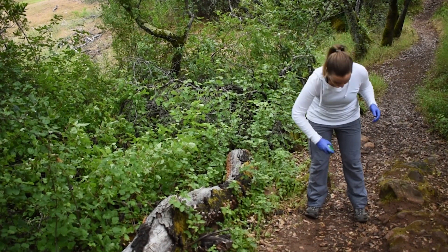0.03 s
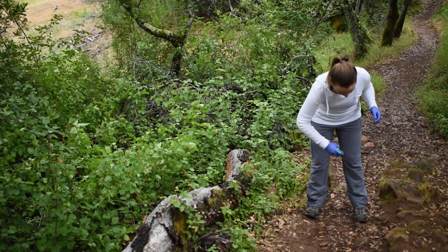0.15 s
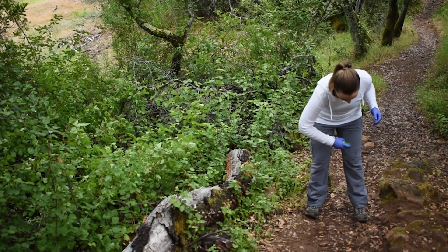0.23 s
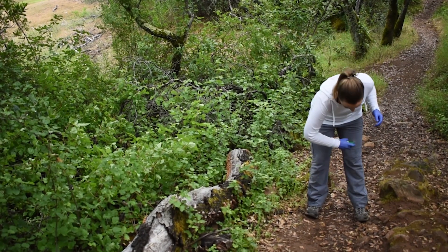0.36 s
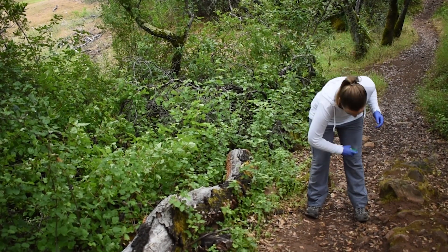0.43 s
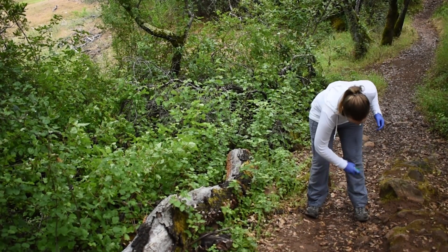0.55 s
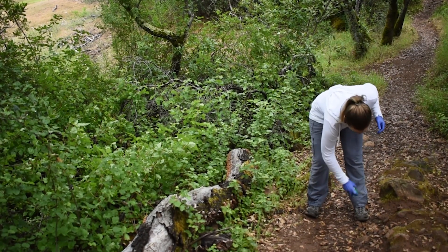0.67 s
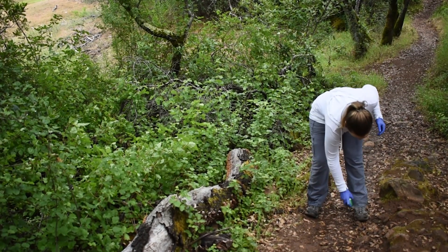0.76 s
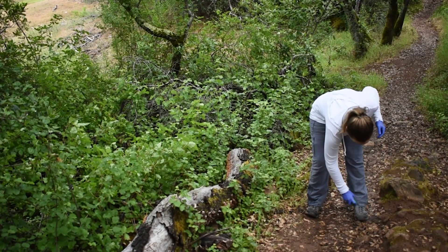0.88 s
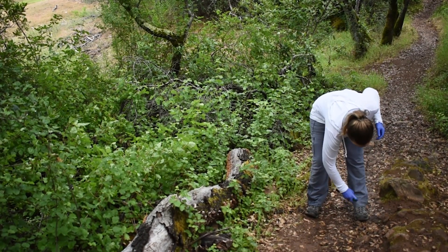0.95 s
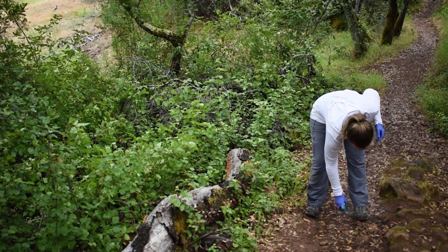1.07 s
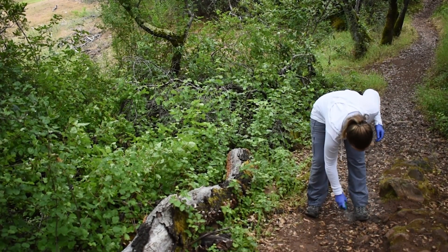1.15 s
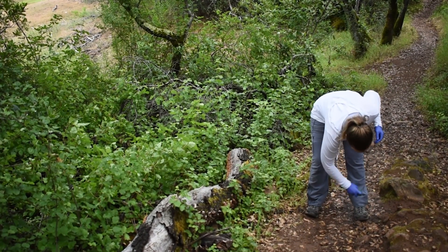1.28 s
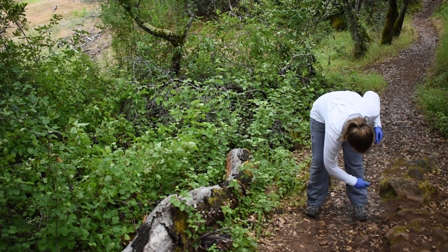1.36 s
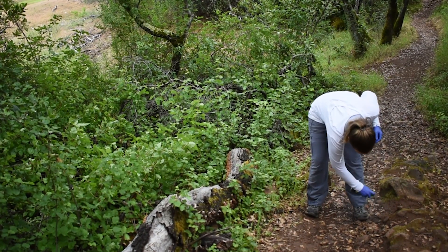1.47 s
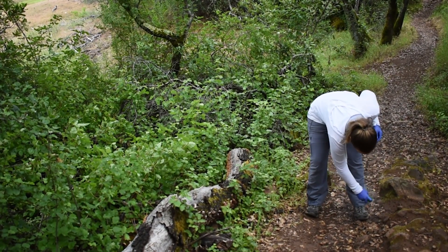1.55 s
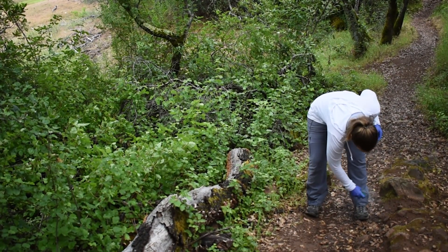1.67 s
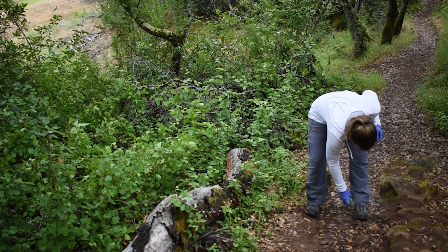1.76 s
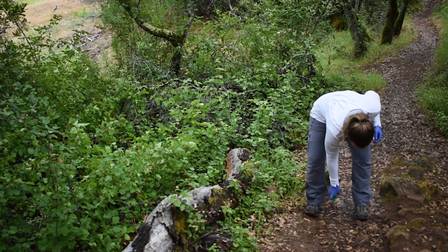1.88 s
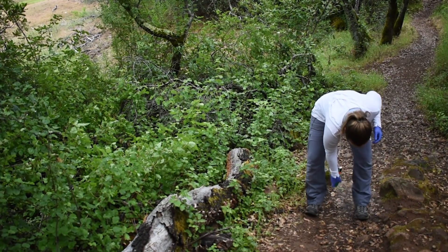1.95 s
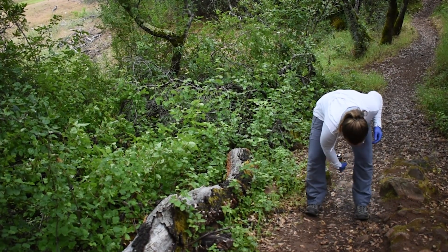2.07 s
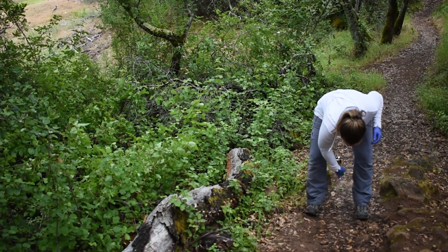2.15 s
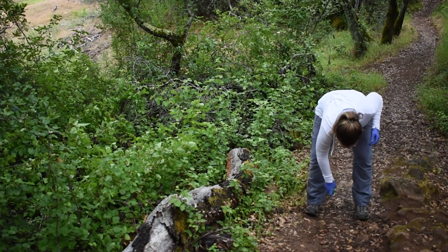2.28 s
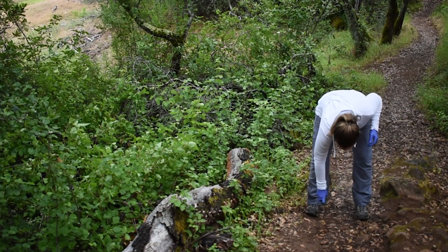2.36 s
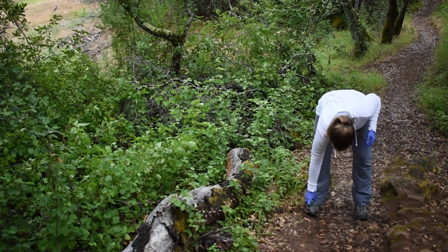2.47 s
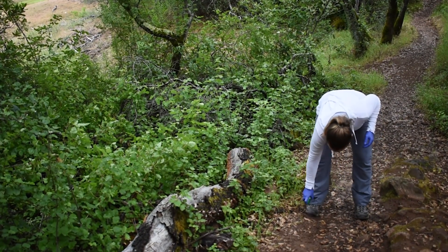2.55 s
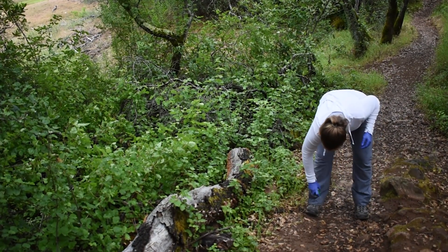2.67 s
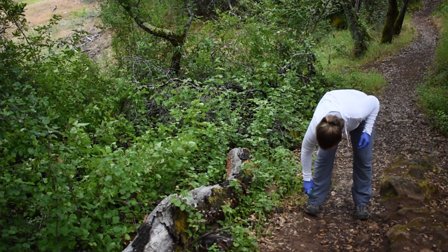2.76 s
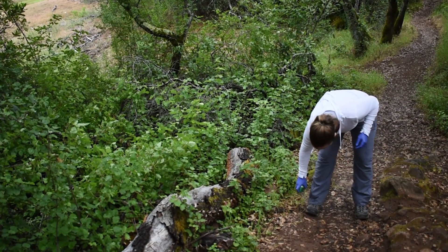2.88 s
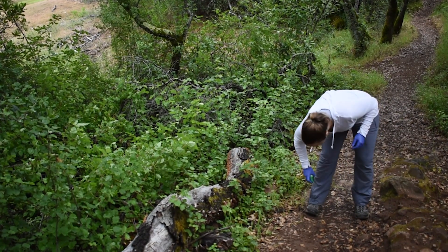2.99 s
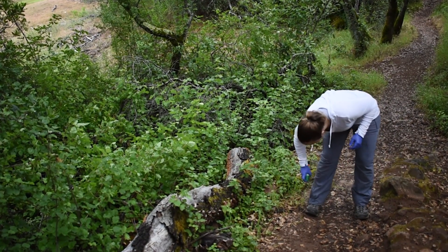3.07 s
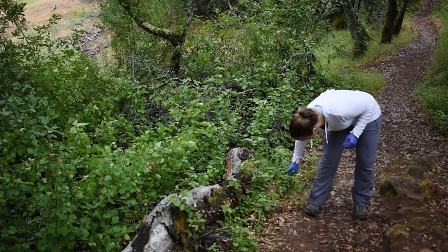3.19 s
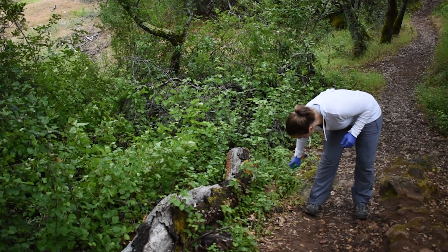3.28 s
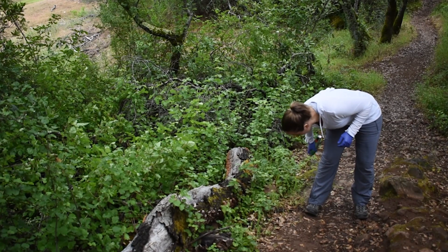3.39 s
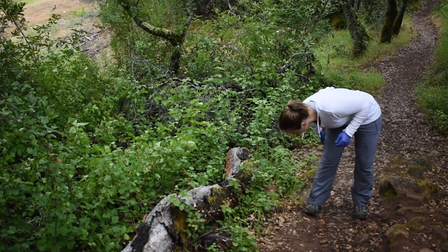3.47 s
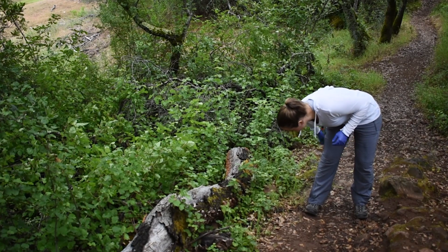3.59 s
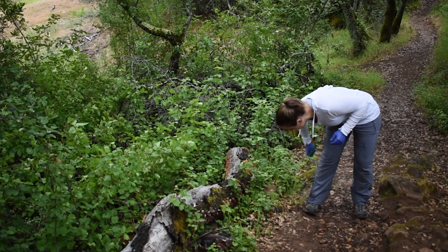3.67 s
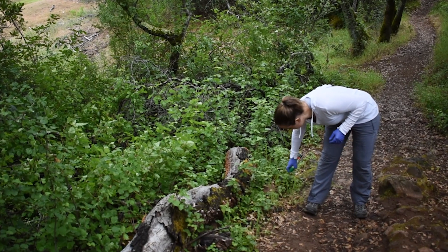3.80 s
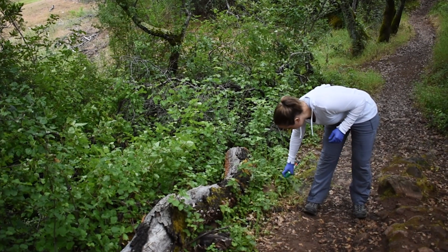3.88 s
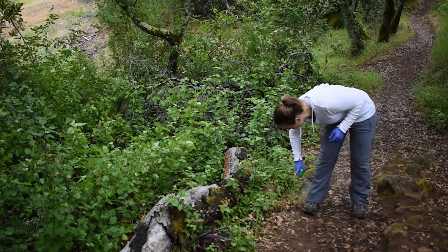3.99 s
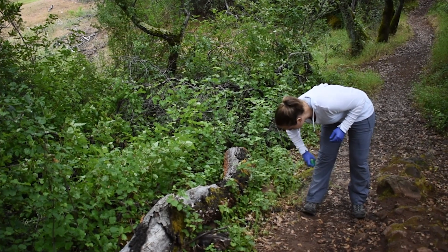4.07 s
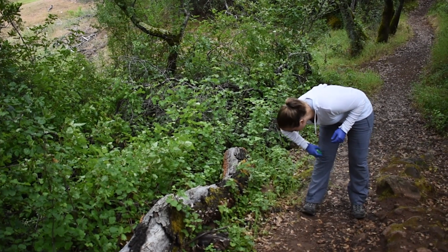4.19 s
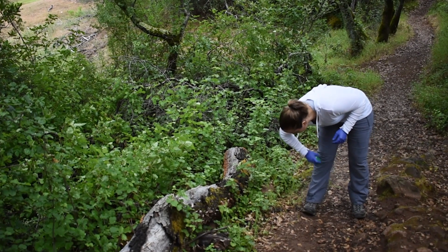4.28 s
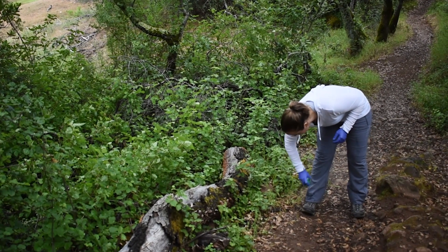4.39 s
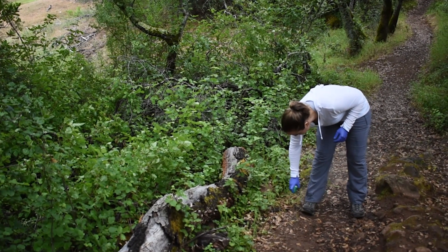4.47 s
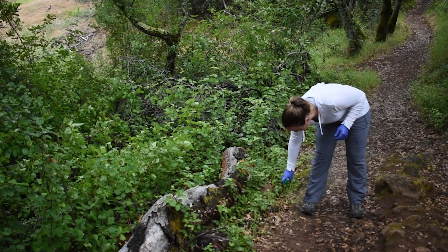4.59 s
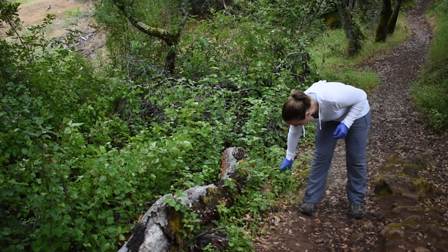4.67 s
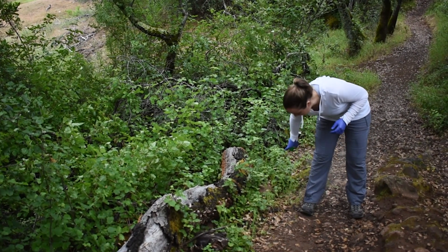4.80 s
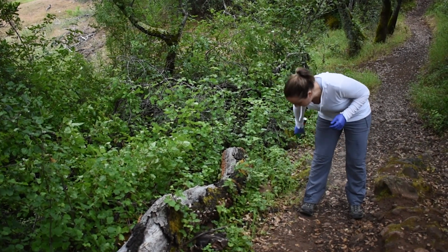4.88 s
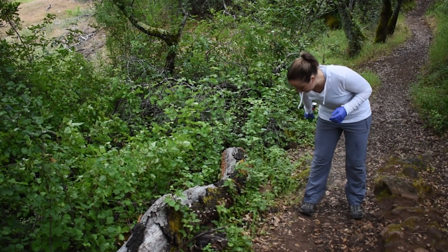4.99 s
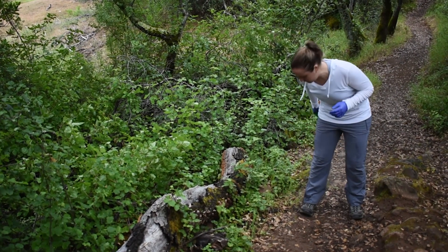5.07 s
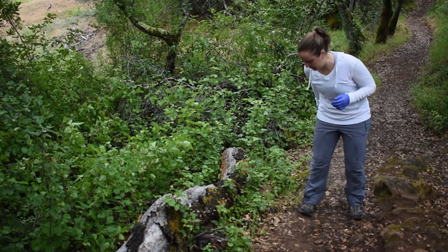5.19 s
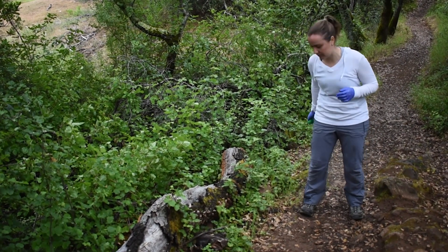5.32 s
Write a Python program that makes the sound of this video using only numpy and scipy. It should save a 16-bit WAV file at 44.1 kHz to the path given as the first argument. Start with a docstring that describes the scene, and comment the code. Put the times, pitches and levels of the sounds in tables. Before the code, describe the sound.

On a wooded path, two long bursts of fizzy spray dominate, separated by a quarter-second gap. Their colour shifts as the hand moves, with a breathy hollow tone underneath. Grip ticks and tiny bird calls precede them; gliding chips to the left grow clearer later, joined by a faint distant whistle. A soft clothing bump and rustle follow the second spray. Wide, soft outdoor air, a centred source and light woodland echo.

```python
"""Two long sprays from a hand-held bottle of repellent, swept over shoes and trouser legs on a forest trail.
The jet is filtered noise that hisses and sputters; a narrow air resonance makes a hollow tone at the nozzle,
and drifting echoes off legs and ground colour the jet as the hand moves.
A bird repeats a gliding chip in the trees among other calls; struck modes tick and bump,
and clothes rustle as filtered noise while the person straightens up after the second spray."""
import sys
import numpy as np
from scipy import signal
from scipy.fft import rfft, irfft
from scipy.io import wavfile
from scipy.ndimage import map_coordinates

SR = 44100
rng = np.random.default_rng(int(sys.argv[2]) if len(sys.argv) > 2 else 0)


def master(y):
    """Save y as 16-bit WAV."""
    cut = np.clip(np.atleast_2d(y).T, -1, 1)
    pcm = np.round(cut * 32767)  # scale
    wavfile.write(sys.argv[1], SR, pcm.astype(np.int16))


N = 235802
T = np.arange(N) / SR  # time of every sample, s


def gain_of(db):
    """Level law: decibels to amplitude ratio."""
    return 10 ** (np.asarray(db) / 20)


def evened(x):
    """Power normalization: scales to rms 1."""
    return x / np.sqrt(np.mean(x ** 2) + 1e-20)


def read(points, hz):
    """Logarithmic frequency scale: interpolates a spectrum along it."""
    f, value = np.transpose(points)
    return np.interp(np.log(hz + 1), np.log(f + 1), value)


def follow(curves):
    """Piecewise-linear envelope: joins the curves of both sprays, one value per sample."""
    return np.interp(T, *np.vstack(curves).T)


def add(mix, s, sound):
    """Superposition: adds a sound into the mix at time s."""
    part = mix[max(round(s * SR), 0):][:len(sound)]
    part += sound[:len(part)]


def noise(spectrum):
    """Spectral shaping: random noise of rms 1 that falls away beyond the ends of its spectrum."""
    hz = np.fft.rfftfreq(N, 1 / SR)
    below, above = (spectrum[0][0] / 2, -70), (spectrum[-1][0] * 2, -70)
    shape = gain_of(read([below, *spectrum, above], hz))
    return evened(irfft(rfft(rng.standard_normal(N)) * shape, N))


def wander(rate_hz):
    """Low-passed randomness: motion of rms 1, no faster than about the given rate."""
    hz = np.fft.rfftfreq(N, 1 / SR)
    return evened(irfft(rfft(rng.standard_normal(N)) * np.exp(-(hz / rate_hz) ** 2), N))


def resonate(x, hz, width_hz):
    """Resonance: a one-pole filter in a rotating frame, gain 1 at the moving frequency hz."""
    turn = np.exp(2j * np.pi * np.cumsum(hz) / SR)
    r = np.exp(-np.pi * width_hz / SR)
    return 2 * (turn * signal.lfilter([1 - r], [1, -r], x / turn)).real


def delayed(x, delay_s):
    """Doppler principle: a shrinking delay raises the pitch of what is read through it."""
    return map_coordinates(x, [(T - delay_s) * SR], order=3, mode="mirror")


def ring(modes, tilt_db=0):
    """Modal decay: a struck object as dying sines of alternating sign, tilted about 2 kHz."""
    t = np.arange(SR // 10) / SR
    partials = []
    for hz, db, t60 in modes:
        level_db = db + tilt_db * np.log2(hz / 2000) - 60 * t / t60
        partials.append(gain_of(level_db) * np.sin(2 * np.pi * hz * t))
    return sum(partials[::2]) - sum(partials[1::2])


def trees(x, t60):
    """Diffuse scattering: a decaying random tail from trunks and leaves, different at each ear."""
    t = np.arange(SR) / SR
    late = t > .008  # the tail starts after 8 ms
    tail = rng.standard_normal((2, SR)) * gain_of(-60 * t / t60) * late
    return signal.fftconvolve(x[None], tail / np.linalg.norm(tail[0]), axes=1)[:, :N]


# spectrum of the forest air: frequency_hz, relative density_db (per Hz)
FOREST_SPECTRUM = [(20, -4), (35, -4), (90, 1), (200, -1), (350, -1), (500, -4.5), (850, -6), (1200, -9),
                   (2300, -13), (3500, -12), (4400, -12.5), (5400, -19.5), (7500, -23), (15500, -26.5)]
# likeness of the two ears: frequency_hz, correlation (0-1)
EAR_LIKENESS = [(30, .75), (500, .72), (1000, .55), (2200, .15), (4200, .15), (6500, .85), (14000, .92)]
FOREST_DB, FOREST_SWELL_DB, FOREST_SWELL_HZ = -65, .8, 1.9


def forest():
    """Interaural coherence: a soft wash of air and leaves, widened by frequency, over a far low drone."""
    likeness = np.clip(read(EAR_LIKENESS, np.fft.rfftfreq(N, 1 / SR)), 0, 1)
    mid = irfft(rfft(noise(FOREST_SPECTRUM)) * np.sqrt((1 + likeness) / 2), N)
    side = irfft(rfft(noise(FOREST_SPECTRUM)) * np.sqrt((1 - likeness) / 2), N)
    air = np.array([mid + side, mid - side])
    drone_hz = np.full(N, 70.)
    drone = evened(resonate(resonate(rng.standard_normal(N), drone_hz, 22), drone_hz, 22))
    swell_db = FOREST_SWELL_DB * wander(FOREST_SWELL_HZ)
    return gain_of(FOREST_DB + swell_db) * air + gain_of(-77.5) * drone


# a long distant whistle, before its small random waver: time_s, pitch_hz, level_db
WHISTLE_CURVE = [(4.3, 3455, -65), (4.55, 3420, -65.5), (4.75, 3460, -61.5), (4.85, 3430, -65.5),
                 (4.95, 3420, -63), (5.15, 3430, -64.5), (5.35, 3420, -67.5)]


def whistle():
    """Frequency modulation: one long, slightly wavering bird note with a weak lower side tone."""
    s, hz, db = np.transpose(WHISTLE_CURVE)
    pitch_hz = np.interp(T, s, hz) + 6 * wander(40.0)
    phase = 2 * np.pi * np.cumsum(pitch_hz) / SR
    note = np.sin(phase) + gain_of(-11) * np.sin(.853 * phase)
    level_db = np.interp(T, s, db, left=-120) + 1.9 * wander(25)
    return gain_of(level_db) * note


# other bird notes: start_s, length_s, level_db, first_hz, middle_hz, last_hz,
# warble_depth_hz, warble_rate_hz, direct_share (0-1, of the power)
BIRD_NOTES = [(0.0, 0.045, -66, 3380, 3390, 3310, 10, 34, 0.7),
              (0.044, 0.061, -62, 4600, 4320, 3760, 330, 62, .12),
              (0.288, .05, -68, 4600, 4150, 3500, 300, 92, 0.6),
              (0.372, 0.06, -69, 5750, 6650, 6250, 20, 39, 0.85),
              (5.147, .13, -61.5, 9000, 8100, 7600, 780, 38, .85)]


def birds():
    """Direct and diffuse sound: gliding, warbling sines, partly blurred by the trees."""
    direct, scattered = np.zeros((2, N))
    for s, length, db, first, middle, last, depth, rate, share in BIRD_NOTES:
        t = np.arange(0, length, 1 / SR)
        arch_hz = np.polyval(np.polyfit([0, .5, 1], [first, middle, last], 2), t / length)
        pitch_hz = arch_hz - depth * np.cos(2 * np.pi * rate * t + np.pi / 6)
        tone = np.sin(2 * np.pi * np.cumsum(pitch_hz) / SR)
        note = gain_of(db) * tone * signal.windows.tukey(len(t), .5)
        share = np.clip(share, 0, 1)
        add(direct, s, np.sqrt(share) * note)
        add(scattered, s, np.sqrt(1 - share) * note)
    return direct + trees(scattered, t60=0.34)


# chips of one bird to the left: start_s, relative level_db
CHIP_TIMES = [(1.215, -68), (1.52, -72), (1.782, -67), (2.112, -51), (2.337, -50.5), (2.566, -52),
              (3.15, -55), (3.942, -47.5), (4.162, -46), (4.373, -48.5), (4.647, -48), (5.194, -51)]
# one chip, a quick fall then a slower one that plunges at its end: time_s, pitch_hz, relative level_db
CHIP_GLIDE = [(0, 5400, -18), (.007, 4400, -3), (.016, 2800, -6), (.02, 3600, -30), (.024, 4550, 0),
              (.036, 4100, 2), (.046, 3550, -1), (.053, 2200, -15), (.06, 1500, -12), (.066, 1400, -30)]
# scatter from leaves close by and from far trees: relative level_db, t60_s
CHIP_SCATTER = [(-1, 0.044), (-5, 0.91)]
CHIP_PAN_DB, CHIP_LAG_S, CHIP_DIRECT_DB = 2.5, .00003, -9  # pan: up on the left, down on the right


def chips():
    """Interaural differences: a repeated chip, earlier and louder at the left, lingering in the trees."""
    s, hz, db = np.transpose(CHIP_GLIDE)
    t = np.arange(0, s[-1], 1 / SR)
    phase = 2 * np.pi * np.cumsum(np.interp(t, s, hz)) / SR
    chip = gain_of(np.interp(t, s, db)) * np.sin(phase)
    song = np.zeros(N)
    for start, level_db in CHIP_TIMES:
        add(song, start, gain_of(level_db) * chip)
    ears = np.array([song, delayed(song, CHIP_LAG_S)])
    direct = ears * gain_of([[CHIP_PAN_DB], [-CHIP_PAN_DB]])
    scattered = sum(gain_of(echo_db) * trees(song, t60) for echo_db, t60 in CHIP_SCATTER)
    return gain_of(CHIP_DIRECT_DB) * direct + scattered


# sliding clothes: time_s, relative level_db
CLOTH_CURVE = [(4.77, -66), (4.82, -70), (4.845, -63.5), (4.86, -58.5), (4.9, -61), (5.0, -62.5),
               (5.1, -61), (5.2, -61.5), (5.35, -67)]
# spectrum of the cloth: frequency_hz, relative density_db (per Hz)
CLOTH_SPECTRUM = [(100, -40), (280, -3), (580, 1.5), (950, -3), (1400, -11), (2500, -15), (6000, -26.5),
                  (11000, -25), (15500, -35)]


def cloth_slide():
    """Friction noise: sliding cloth as shaped noise with a rough envelope."""
    level_db = np.interp(T, *np.transpose(CLOTH_CURVE), left=-120) + 1.5 * wander(60)
    return gain_of(0.5) * noise(CLOTH_SPECTRUM) * gain_of(level_db)


# small plastic ticks as the grip settles: start_s, relative level_db, tilt_db (per octave)
GRIP_TICKS = [(0.0735, -51, -1), (0.1017, -47.5, 2.5), (0.1308, -54.5, 6)]
# modes of the plastic: frequency_hz, relative level_db, t60_s
PLASTIC_MODES = [(935, 6.5, 0.012), (2450, 2, 0.01), (3300, 0.5, 0.0056), (4760, 5.5, 0.0026)]


def grip_ticks():
    """Modal impact: plastic modes rung together, their treble softened by a low-pass."""
    out = np.zeros(N)
    soften = signal.butter(2, 5500, fs=SR, output="sos")
    for s, db, tilt_db in GRIP_TICKS:
        add(out, s, gain_of(db) * signal.sosfilt(soften, ring(PLASTIC_MODES, tilt_db)))
    return out


# soft bumps of clothing: start_s, relative level_db
CLOTH_BUMPS = [(2.853, -42.5), (4.825, -47), (4.8479, -38)]
# modes of a bump: frequency_hz, relative level_db, t60_s
CLOTH_MODES = [(192, 0.5, 0.017), (440, 4, 0.007), (920, -2, 0.016)]


def cloth_bumps():
    """Damped impact: short low modes, confined to a band so that they sound padded."""
    out = np.zeros(N)
    padding = signal.butter(2, [70, 1300], "bandpass", fs=SR, output="sos")
    for s, db in CLOTH_BUMPS:
        add(out, s, gain_of(db) * signal.sosfilt(padding, ring(CLOTH_MODES)))
    return out


# hollow tone in each spray, before its flutter: time_s, relative level_db
TONE_LEVEL = [
    [(0.5, -48.5), (0.874, -40.5), (1.152, -42.5), (1.208, -52), (1.316, -44.5), (1.36, -63),
     (1.422, -43.5), (1.64, -52.5), (1.838, -42), (2.06, -57), (2.156, -44), (2.32, -47.5)],
    [(2.64, -45.5), (2.67, -37.5), (2.79, -43), (2.81, -53.5), (2.88, -50), (2.95, -58.5), (3.48, -47.5),
     (3.89, -49.5), (4.04, -40.5), (4.49, -50), (4.7, -45.5), (4.74, -54)],
]
# centre of its band in each spray, before the swing is stretched: time_s, pitch_hz
TONE_PITCH = [
    [(0.5, 1330), (0.758, 1299), (0.966, 1379), (1.442, 1306), (1.558, 1272), (1.686, 1337), (2.08, 1360),
     (2.188, 1260), (2.32, 1354)],
    [(2.64, 1310), (2.76, 1288), (2.94, 1424), (3.0, 1260), (3.11, 1376), (3.24, 1247), (3.38, 1322),
     (3.89, 1304), (4.74, 1320)],
]
# usual pitch, stretch of the swing about it (ratio), random waver
NOZZLE_HZ, NOZZLE_SWING, NOZZLE_WAVER_HZ = 1320, 1.5, 22


def nozzle():
    """Noise-driven resonance: turbulence blows one narrow air mode into a fuzzy, fluttering whistle."""
    swing_hz = NOZZLE_SWING * (follow(TONE_PITCH) - NOZZLE_HZ)
    pitch_hz = NOZZLE_HZ + swing_hz + NOZZLE_WAVER_HZ * wander(7)
    narrow = resonate(rng.standard_normal(N), pitch_hz, width_hz=150)
    tone = resonate(narrow, pitch_hz, width_hz=240)
    flutter_db = 1.5 * wander(60)
    return gain_of(follow(TONE_LEVEL) + flutter_db - 0.24) * evened(tone)


# usual levels, about which the jet's parts follow one another
USUAL_HISS_DB, USUAL_RUSH_DB = -42, -60
# spectrum of the lower rush: frequency_hz, relative density_db (per Hz)
LOWER_RUSH_SPECTRUM = [(150, -15), (420, -7), (650, -3), (900, 5), (1300, 6), (1750, 1), (2200, -2.5),
                       (2700, -3), (3400, -6), (4500, -15)]
BOTTOM_DB, BOTTOM_WITH_RUSH = -53, 0.2  # usual gain; how far it follows the rush, dB per dB


def lower_rush(level_db):
    """Band splitting: the dull rush of the jet, whose bottom swells less than its top."""
    whole = noise(LOWER_RUSH_SPECTRUM)
    bottom = signal.sosfiltfilt(signal.butter(2, 1300, fs=SR, output="sos"), whole)
    top = whole - bottom
    bottom_db = BOTTOM_DB + BOTTOM_WITH_RUSH * (level_db - USUAL_RUSH_DB)
    return gain_of(bottom_db) * bottom + gain_of(level_db + 7.0) * top


# spectrum of the upper rush: frequency_hz, relative density_db (per Hz)
UPPER_RUSH_SPECTRUM = [(2400, -28), (3200, -5), (3800, 4), (4500, 2), (5100, 6), (5600, 0.5), (6400, 5),
                       (7300, 2), (8800, -17)]


def upper_rush(level_db):
    """Broadband turbulence: the middle band of the jet, under the hiss."""
    return gain_of(level_db + 0.4) * noise(UPPER_RUSH_SPECTRUM)


# spectrum of the finest mist: frequency_hz, relative density_db (per Hz)
MIST_SPECTRUM = [(9500, -61), (11000, 3.5), (11700, 4.5), (12600, -2), (13500, -7.5), (15600, -12),
                 (18000, -22)]
# usual level; how far it follows the hiss and the lower rush, dB per dB
MIST_DB, MIST_WITH_HISS, MIST_WITH_RUSH = -53, 0.33, 0.24


def mist(hiss_db, lower_db):
    """Coupled levels: the top treble of the jet partly follows its hiss and its lower rush."""
    from_hiss_db = MIST_WITH_HISS * (hiss_db - USUAL_HISS_DB)
    from_rush_db = MIST_WITH_RUSH * (lower_db - USUAL_RUSH_DB)
    return gain_of(MIST_DB + from_hiss_db + from_rush_db) * noise(MIST_SPECTRUM)


# spectrum of the hiss, before it is shifted: frequency_hz, relative density_db (per Hz)
HISS_SPECTRUM = [(4500, -30), (5800, -11.5), (6600, -7), (7400, -1.5), (8400, 3.5), (8850, -1.5),
                 (9450, 5.5), (10200, 1.5), (11000, -1), (12000, -53), (13500, -57)]
HISS_HZ = 9185  # centre of that spectrum
HISS_CENTRE_HZ, BRIGHTEN_HZ_PER_DB = 9076, 40  # centre at the usual level, rise with loudness
DRIFT_HZ, DRIFT_RATE_HZ = 220, 4  # slow drift of the colour


def hiss(level_db):
    """Spectral shift: a moving delay slides the hiss upward as it grows louder."""
    brighten_hz = BRIGHTEN_HZ_PER_DB * (level_db - USUAL_HISS_DB)
    centre_hz = HISS_CENTRE_HZ + brighten_hz + DRIFT_HZ * wander(DRIFT_RATE_HZ)
    delay_s = np.cumsum(1 - centre_hz / HISS_HZ) / SR
    return gain_of(level_db + 0.03) * delayed(noise(HISS_SPECTRUM), delay_s)


def near_echoes(x, share, sweep, sweep_hz):
    """Comb filtering: copies off legs, arm and ground drift and fade with the hand, in patches of colour."""
    delays = np.geomspace(.0006, .0028, num=7)  # resting delays, s
    sizes = [share * np.tanh(wander(2 * sweep_hz)) for _ in delays]
    copies = [size * delayed(x, d * np.exp(sweep * wander(sweep_hz))) for size, d in zip(sizes, delays)]
    return (x + sum(copies)) / np.sqrt(1 + sum(size ** 2 for size in sizes))


# the two presses of the button: opens_s, shuts_s
VALVE_TIMES = [(0.467, 2.353), (2.605, 4.771)]


def valve(open_s, shut_s):
    """Flow control: flow goes from 0 to 1 as the button is pressed, and back as it is let go."""
    travel = np.zeros(N)
    for on, off in VALVE_TIMES:
        travel += np.clip((T - on) / open_s, 0, 1) * np.clip((off - T) / shut_s, 0, 1)
    return np.sin(np.pi / 2 * travel) ** 2


# hiss in each spray, swelling as the jet turns toward the listener: time_s, relative level_db
HISS_CURVE = [
    [(0.52, -42), (0.55, -38), (0.95, -45.5), (1.146, -35), (1.658, -49.5), (1.742, -40), (2.32, -43)],
    [(2.65, -40.5), (2.88, -37.5), (3.02, -46.5), (3.5, -43), (3.73, -49.5), (3.98, -42), (4.1, -43),
     (4.16, -38), (4.48, -47.5), (4.51, -39.5), (4.69, -42), (4.74, -44)],
]
# upper rush in each spray: time_s, relative level_db
UPPER_CURVE = [
    [(0.53, -46.5), (1.008, -50), (1.172, -60), (1.252, -48), (1.292, -54.5), (1.422, -57), (1.462, -46.5),
     (1.67, -56), (1.806, -48.5), (1.956, -51.5), (2.244, -48), (2.32, -54.5)],
    [(2.66, -55.5), (3.41, -60.5), (3.59, -56), (3.92, -57), (3.96, -55.5), (4.4, -50), (4.56, -57.5),
     (4.7, -54), (4.72, -65)],
]
# lower rush in each spray: time_s, relative level_db
LOWER_CURVE = [
    [(0.52, -54), (0.57, -52.5), (1.452, -58.5), (1.622, -72), (1.762, -50.5), (1.808, -59), (2.32, -56)],
    [(2.66, -55.5), (3.21, -74.5), (3.6, -60.5), (3.72, -68.5), (4.06, -58.5), (4.47, -66), (4.72, -61.5)],
]
# the jet spits or chokes: time_s, change_db, length_s (centre to 1/e of the change)
JET_SPITS = [(0.9, 5, 0.009), (1.098, 3, 0.0014), (1.177, 0, 0.0027), (1.242, -7, 0.0029),
             (1.947, -6.5, 0.0051), (1.957, 0, .005), (1.988, -11, 0.0039), (3.188, 4.5, 0.0031),
             (3.284, 4, 0.0022), (3.996, 7, 0.0051)]


def spray():
    """Turbulent jet noise: uneven liquid flow makes the bands sputter and shakes the hollow tone."""
    hiss_db, upper_db, lower_db = follow(HISS_CURVE), follow(UPPER_CURVE), follow(LOWER_CURVE)
    sputter_db = wander(44) + wander(550)
    spits_db = sum(db * np.exp(-((T - at) / length) ** 2) for at, db, length in JET_SPITS)
    fizz = hiss(hiss_db) + mist(hiss_db, lower_db)
    rush = upper_rush(upper_db) + lower_rush(lower_db)
    # the rush and the tone are shaken less than the fizz
    jet = fizz * gain_of(sputter_db + spits_db) + rush * gain_of(0.28 * sputter_db + .4 * spits_db)
    # only the jet meets the near echoes; the hollow tone stays plain
    jet = near_echoes(jet, share=.52, sweep=.13, sweep_hz=3.2)
    tone = nozzle() * gain_of(.4 * spits_db)
    return (jet + tone) * valve(open_s=0.035, shut_s=0.042)


def scene():
    """Superposition: near sounds sit in the middle, while the birds spread through the trees."""
    # a second random draw of the spray feeds the short diffuse wash, the same at both ears
    wash = gain_of(-21.5) * trees(spray(), t60=0.28)[0]
    handling = cloth_slide() + grip_ticks() + cloth_bumps()
    left_whistle = whistle() * gain_of([[1.5], [-1.5]])
    return forest() + left_whistle + birds() + chips() + handling + wash + spray()


def record(dry):
    """Band limiting: a linear-phase low-pass at 15.7 kHz."""
    lowpass = signal.firwin(511, 15700, window=("kaiser", 9), fs=SR)
    return signal.oaconvolve(dry, lowpass[None], "same")


dry = scene()
out = record(dry)
master(out)
```